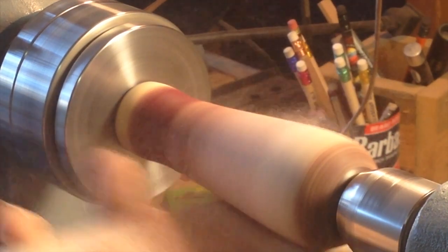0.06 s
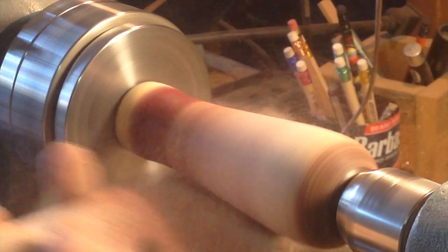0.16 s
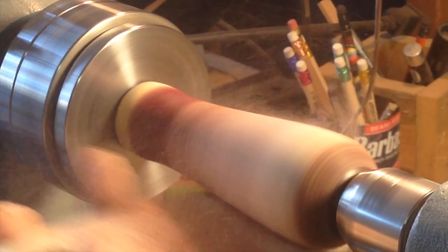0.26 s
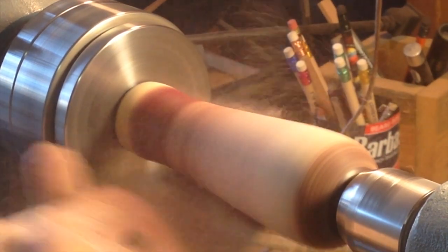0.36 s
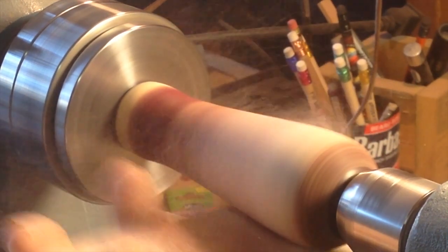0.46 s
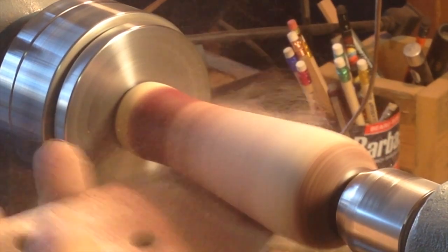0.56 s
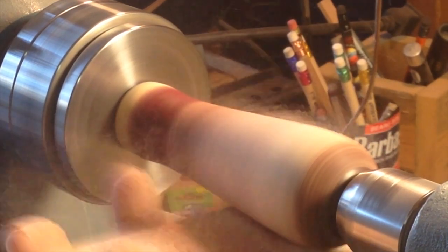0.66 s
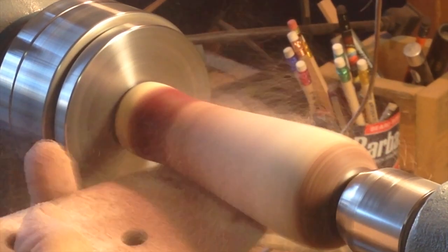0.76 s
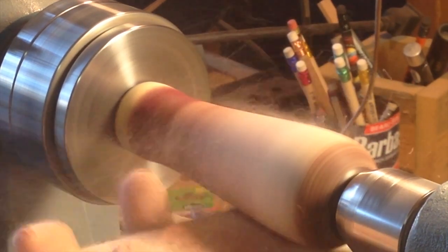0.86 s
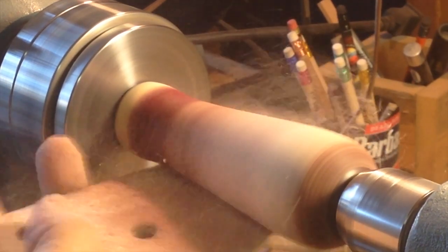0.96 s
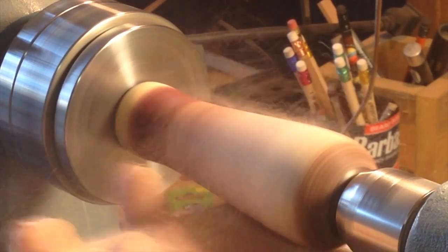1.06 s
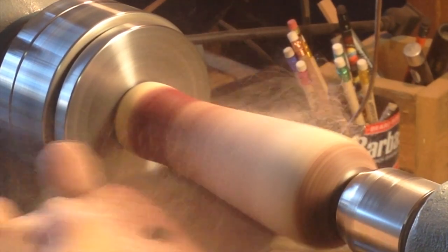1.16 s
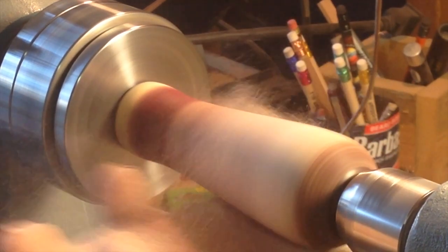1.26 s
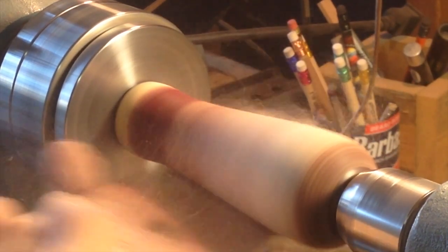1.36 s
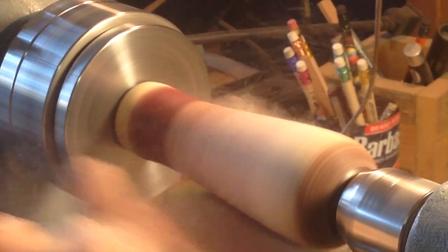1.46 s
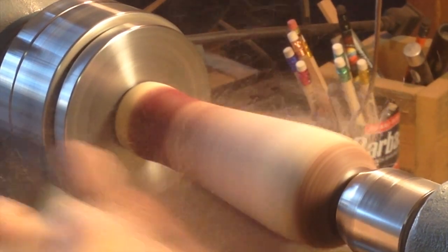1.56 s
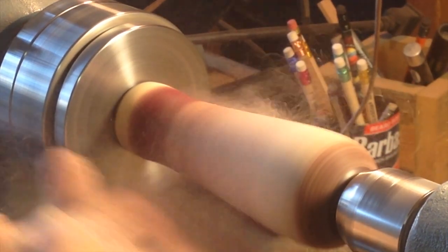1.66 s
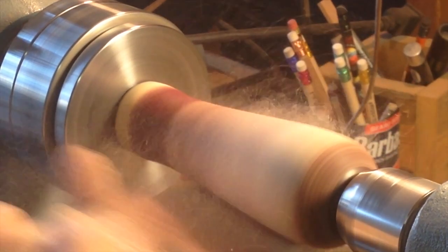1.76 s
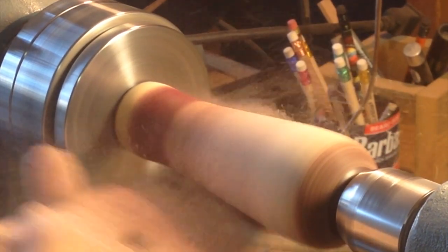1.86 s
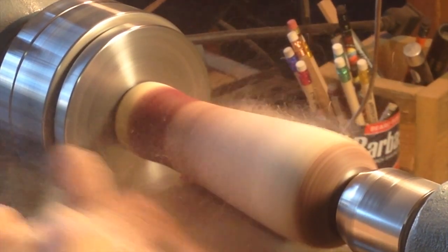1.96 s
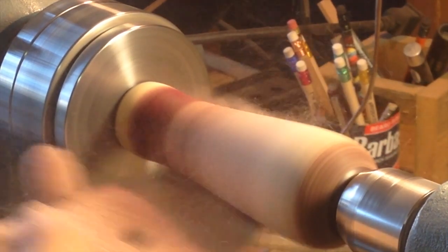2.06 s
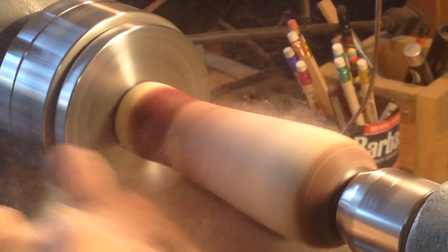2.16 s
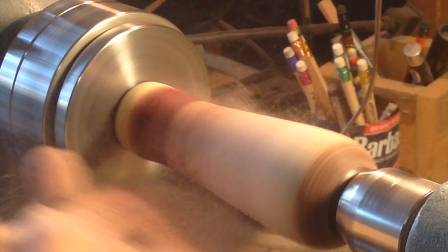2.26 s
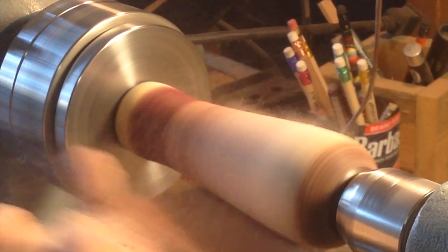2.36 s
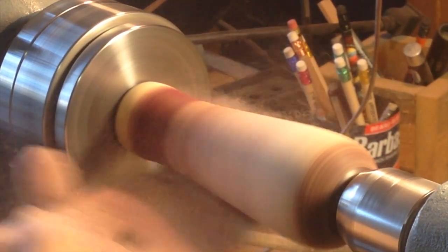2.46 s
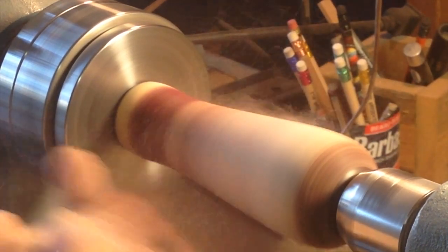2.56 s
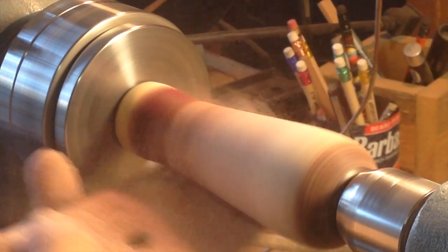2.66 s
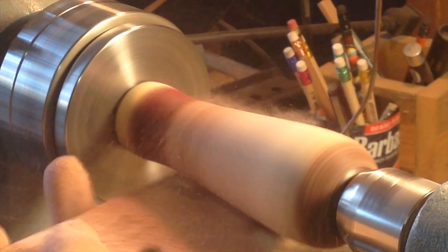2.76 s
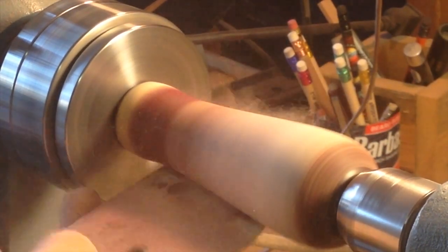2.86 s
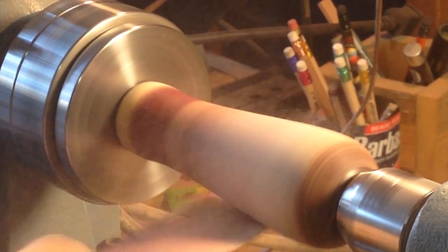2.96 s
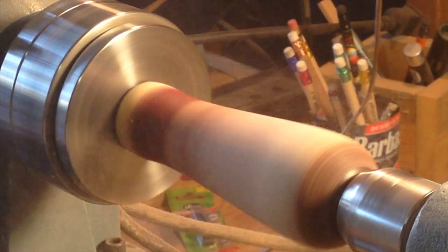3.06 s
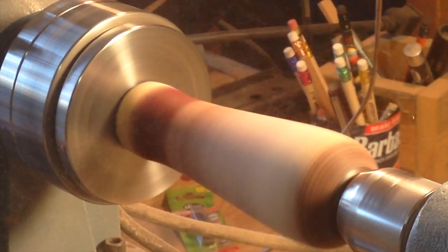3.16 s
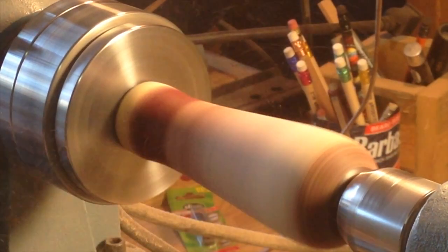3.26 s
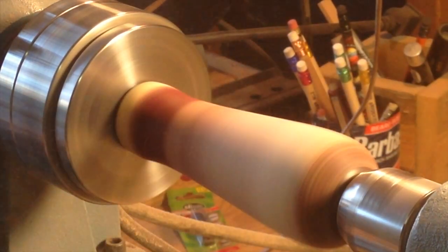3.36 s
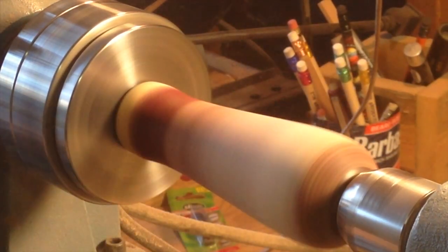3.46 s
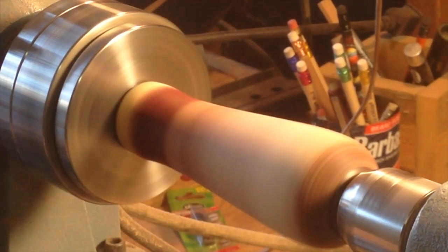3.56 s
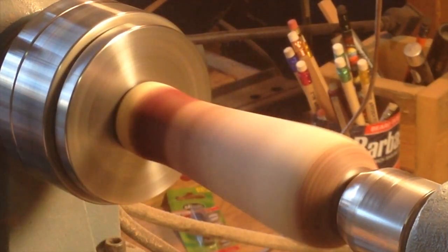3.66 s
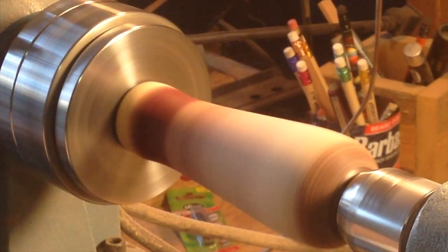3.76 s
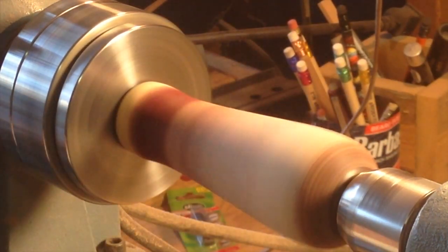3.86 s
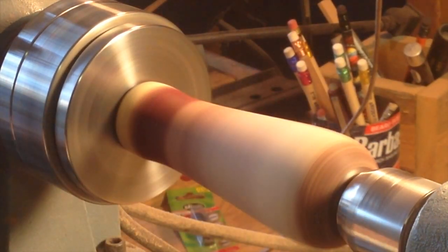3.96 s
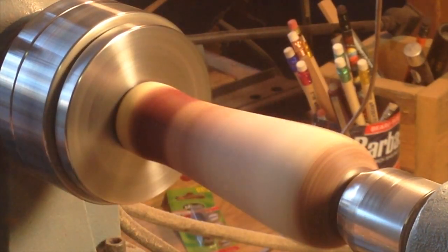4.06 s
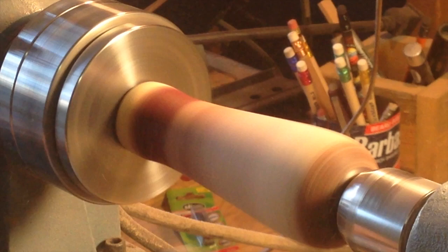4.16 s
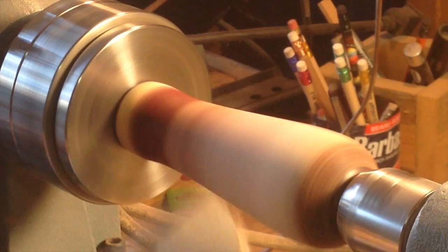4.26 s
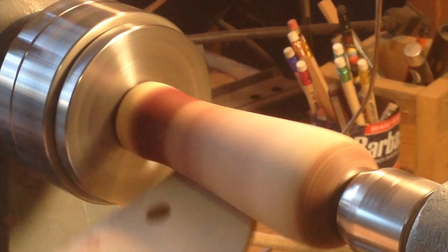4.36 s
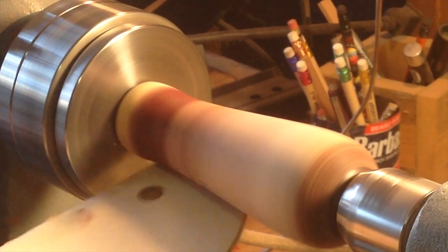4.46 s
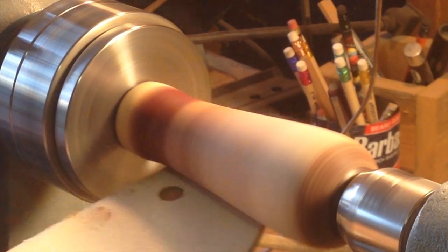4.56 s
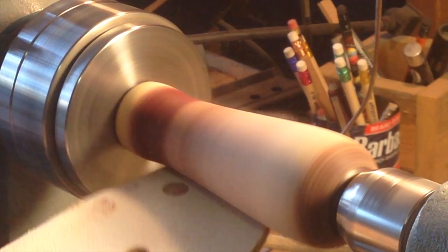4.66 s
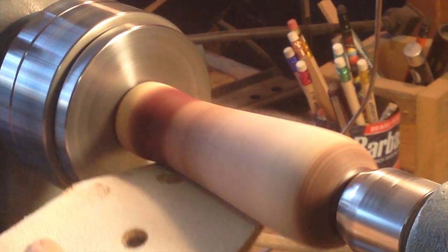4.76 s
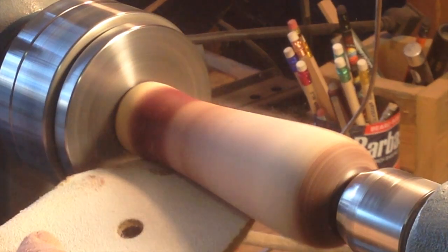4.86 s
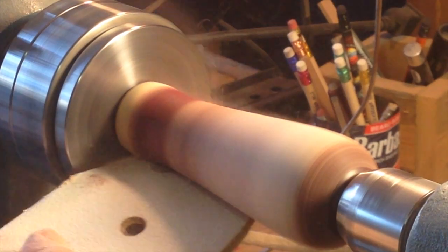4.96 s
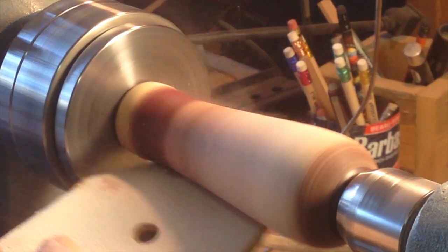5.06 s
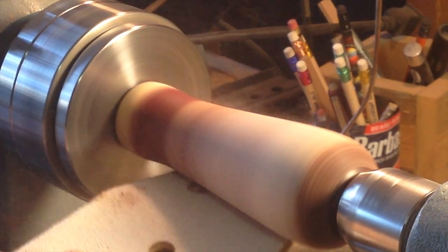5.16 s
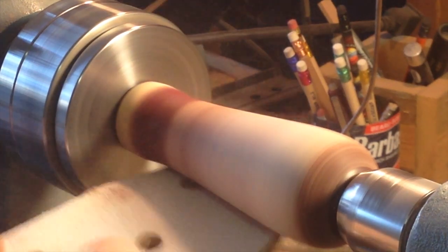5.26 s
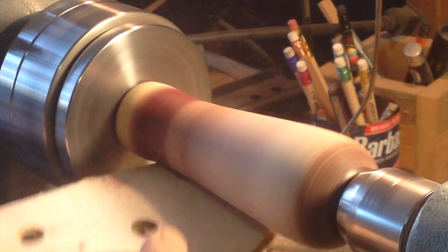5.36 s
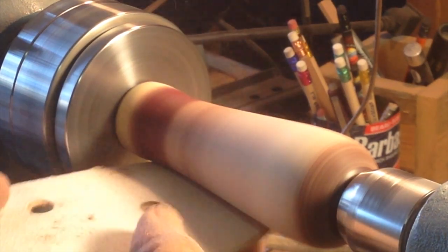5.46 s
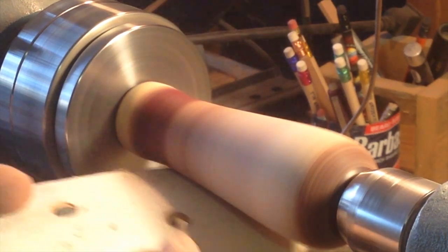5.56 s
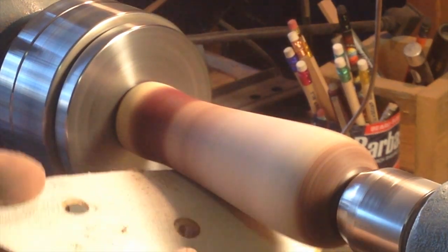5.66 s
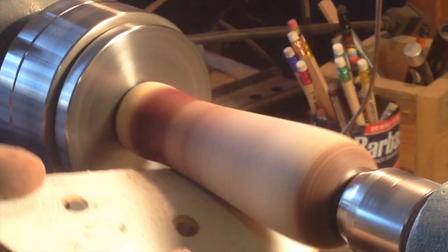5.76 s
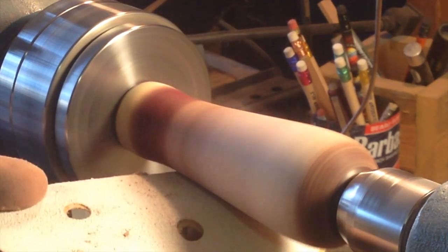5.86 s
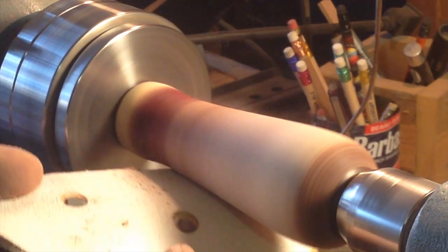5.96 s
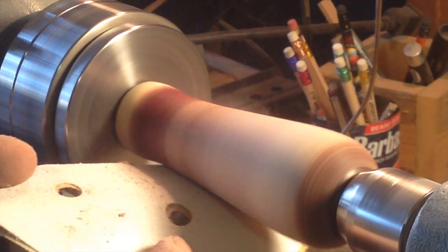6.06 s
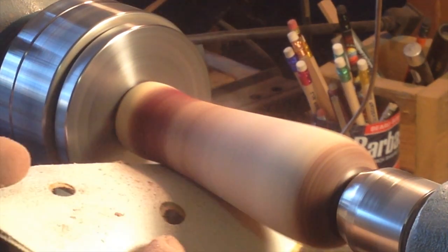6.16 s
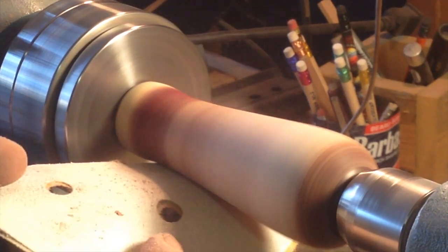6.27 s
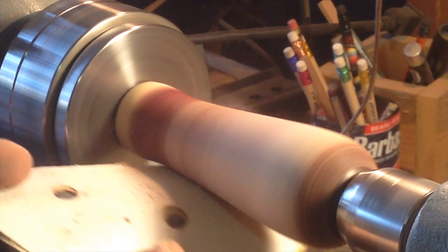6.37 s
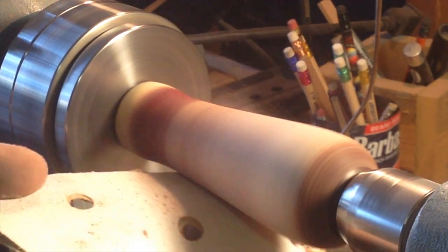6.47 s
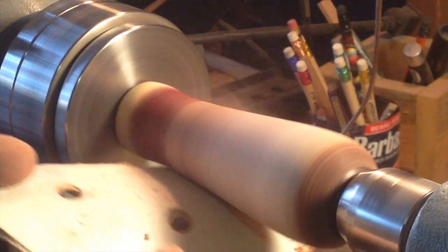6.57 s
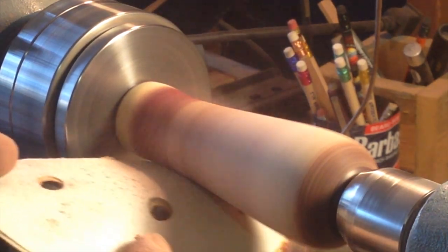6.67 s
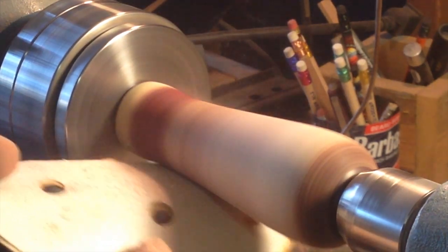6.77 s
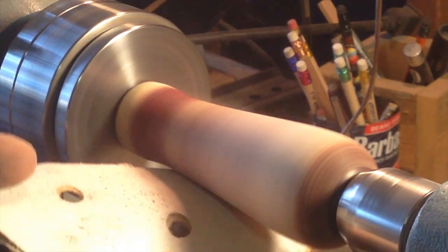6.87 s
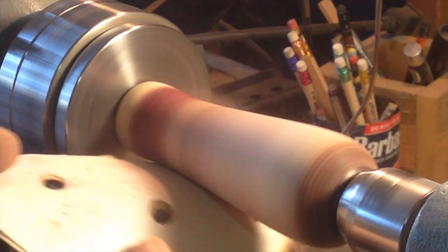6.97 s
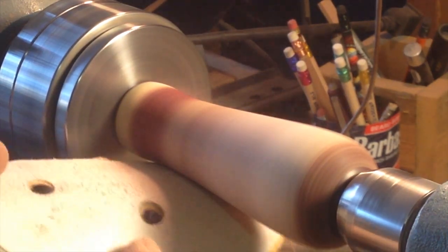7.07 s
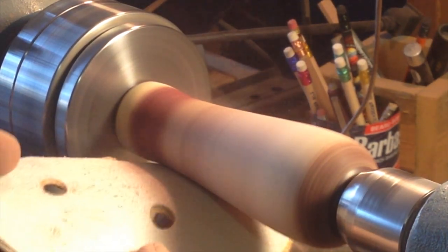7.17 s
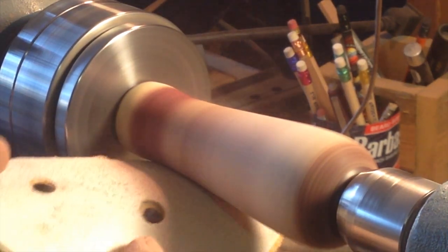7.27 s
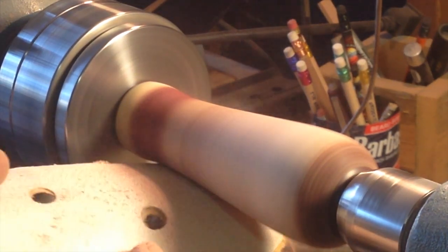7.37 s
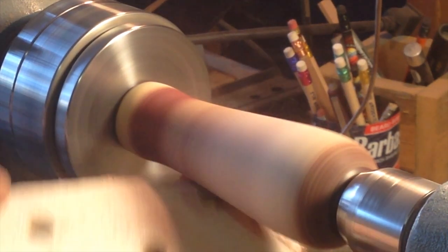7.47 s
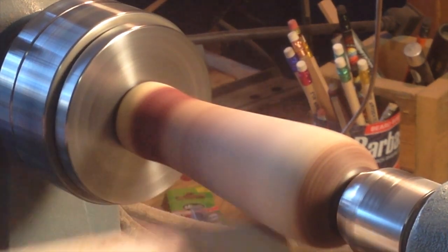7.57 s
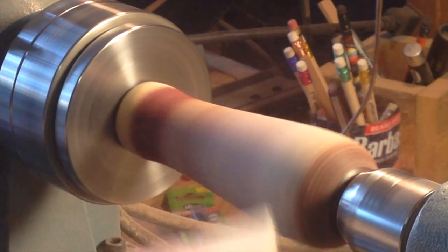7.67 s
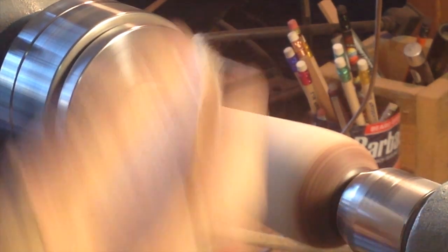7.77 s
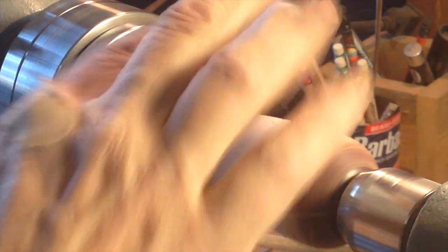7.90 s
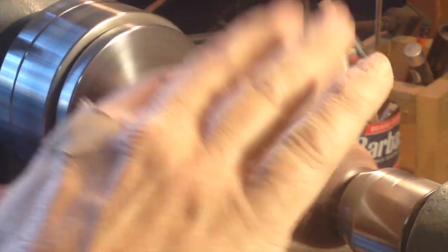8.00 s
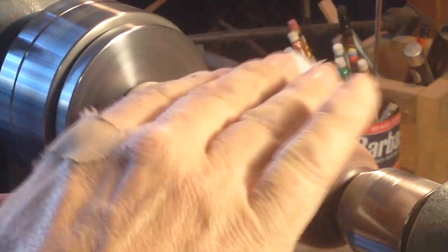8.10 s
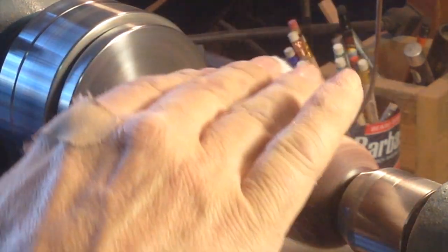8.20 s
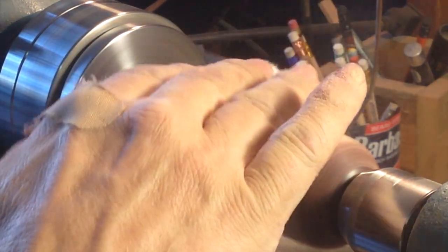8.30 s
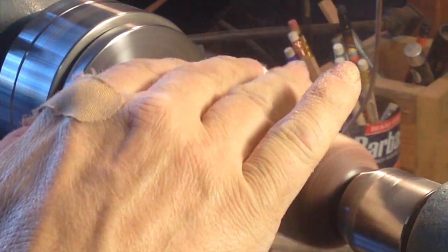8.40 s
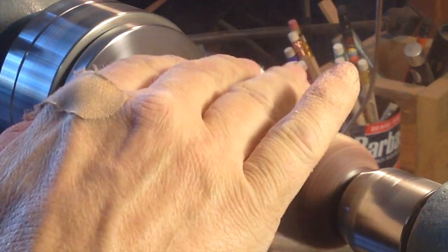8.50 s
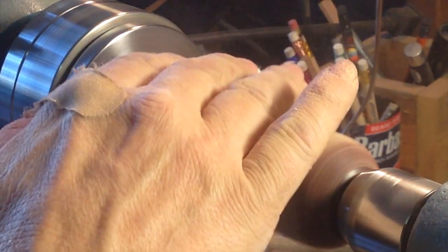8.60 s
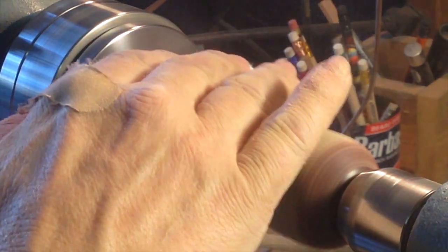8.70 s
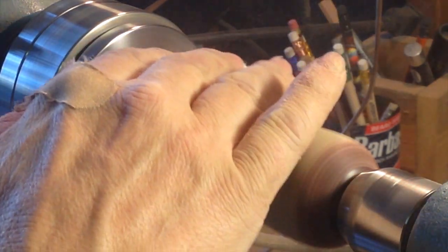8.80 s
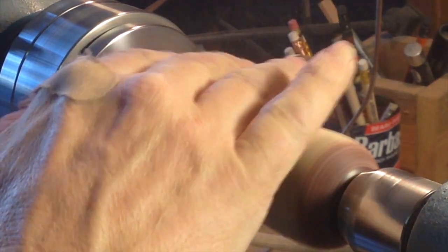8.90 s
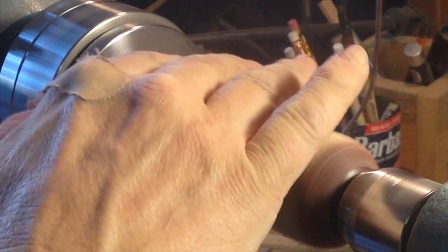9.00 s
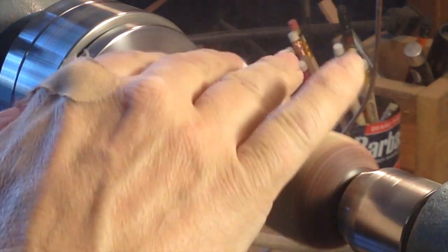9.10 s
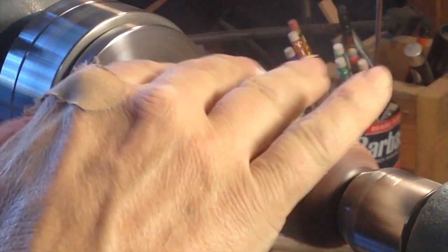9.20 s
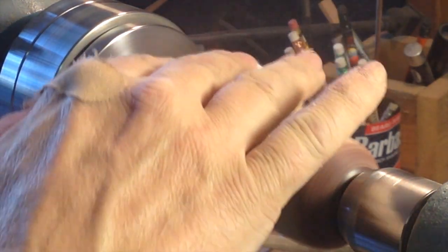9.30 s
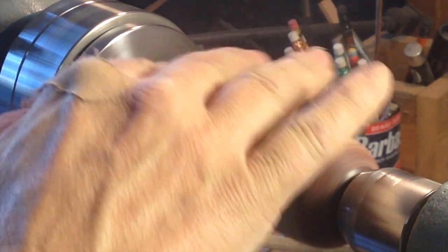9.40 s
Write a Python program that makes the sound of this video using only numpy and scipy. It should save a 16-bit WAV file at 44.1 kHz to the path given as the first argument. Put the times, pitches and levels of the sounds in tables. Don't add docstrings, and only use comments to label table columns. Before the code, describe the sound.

Close sandpaper hiss on spinning wood comes and goes over a buzzing lathe motor with fluttering metallic rattle, including one sharp catch and snap.

```python
import sys
import numpy as np
from scipy import signal
from scipy.fft import rfft, irfft, next_fast_len
from scipy.io import wavfile
from scipy.ndimage import uniform_filter1d, minimum_filter1d

SR = 44100
rng = np.random.default_rng(int(sys.argv[2]) if len(sys.argv) > 2 else 0)


def nominal_scale(level):
    x = np.asarray(level, float) / 20
    return 10 ** x


def store_wav(level_fs):
    pcm = np.round(np.clip(np.atleast_2d(level_fs), -1, 1) * 32767)
    wavfile.write(sys.argv[1], SR, pcm.T.astype(np.int16))


N = 416291

# pitch_hz, level_db (per Hz)
RUSH = [(15, -63), (25, -24), (69, -12), (121, -1.5), (191, -10), (257, -4), (404, -7), (558, -15.5),
        (811, -18), (1000, -19), (1150, -20), (1540, -20), (2130, -22), (4040, -30), (15000, -43.5)]
RUSH_DB = -42.5
# pitch_hz, width_hz, level_db
CASTING = [(215, 28, 1), (2240, 170, -9), (2380, 100, 8), (3420, 150, 1.5), (3950, 150, 8.5),
           (5640, 900, -0.5)]
# pitch_hz, level_db
BELT = [(40, -82), (70, -69), (115, -66.5), (200, -71), (285, -68.5), (420, -70.5), (620, -74), (760, -82)]
BELT_TAKES_DB = -6
# pitch_hz, level_db
TONES = [(164.5, -59), (535.7, -69.5), (689, -72), (889.8, -66.5), (920.5, -73), (982, -63),
         (1011.3, -59.5)]

# time_s, level_db
BUZZ = [(0, -41.5), (.75, -40.2), (1.25, -42), (1.7, -39), (2.15, -42.5), (2.7, -39.5), (3.15, -42),
        (4.2, -41), (4.95, -44), (5.45, -40), (6.2, -43.5), (6.8, -40.5), (7.35, -43), (7.7, -38),
        (8.2, -41), (8.7, -41.5), (9.2, -38.5), (9.43, -39.7)]
BUZZ_HZ = 119.865
BUZZ_START = (-.065, .17)
# level_db at the usual buzz, usual_buzz_db, gain_db per dB of buzz
THIRD = (-60, -39.5, 2.8)
# start_s, end_s, level_db, lag_turns
SURGES = [
    (3.6, 4.8, -40.5, 0.01),
    (5.714, 5.945, -41.5, 0.13),
    (8.124, 8.2, -41, 0.17),
]
UPPER_DB, SURGE_RISE_S, SURGE_FALL_S, SWING_TURNS = -51, 0.54, 0.49, 0.61
# multiple of twice mains, level_db under it
OVERTONES = [(3, -22), (5, -25), (6, -18)]
FLUTTER_HZ, FLUTTER_DB = (580, 660), -17

# time_s, speed_hz (turns a second)
SPEED = [(0.0, 22.346), (1.0, 22.296), (1.6, 22.283), (2.4, 22.303), (3.6, 22.388), (4.4, 22.381),
         (5.2, 22.341), (5.8, 22.364), (7.0, 22.294), (7.5, 22.312), (8.3, 22.397), (9.43, 22.296)]
# multiple of the speed, level_db
ORDERS_DB = [(2, -63), (3, -58), (4, -67), (5, -66), (6, -51), (8, -71), (10, -68), (11, -47.5), (12, -52),
             (13, -57.5), (14, -55.5), (15, -53.5), (16, -59), (17, -53.5), (18, -58.5), (19, -56.5),
             (20, -61), (22, -63), (24, -73), (28, -69), (29, -74)]
PUSH_TURN, LOW_LAG, HIGH_LAG = .2, .02, .23

# first_knock_s, rate_hz (knocks a second)
BURSTS = [(0.024, 29.765), (0.765, 29.72), (1.508, 29.745), (2.351, 29.76), (3.225, 29.815),
          (4.471, 29.795), (5.412, 29.81), (6.421, 29.755), (7.264, 29.82), (8.373, 29.755), (9.216, 29.72)]
# lull_db, peak_s, peak_db
RATTLE = [(-47.5, 0.37, -47), (-61, 1.19, -46), (-62, 2.01, -47), (-58, 2.93, -46.5), (-61.5, 3.93, -45.5),
          (-62, 5, -46), (-56.5, 6.12, -45.5), (-63, 6.8, -45.5), (-62, 7.82, -45.5), (-56.5, 8.7, -45),
          (-58.5, 9.5, -46)]
ARCH_POWER = 2.6
HOUSING_HZ = [718, 1011, 1350, 1520, 1579, 1625, 1715, 1885, 1548]
# level_db, t60_s
HOUSING = [(-14, 0.068), (-19, 0.094), (-1.8, 0.042), (-12, 0.035), (-7, .3), (-11, 0.04), (-5, 0.043),
           (-16.5, 0.063), (-11, 0.27)]
TOP_HZ = [2150, 2540, 3150, 3360, 3790, 3975, 4850, 5450, 5740]
# level_db, t60_s
HOUSING_TOP = [(-15.5, 0.12), (-14.5, 0.042), (-9, 0.011), (-10, 0.032), (-13, 0.055), (-14.5, 0.083),
               (-18, 0.024), (-9.5, 0.019), (-10, 0.017)]
# fifth_mode_db, eighth_mode_db, ninth_mode_db
STRIKE = [(-4, 11, -34), (-2, 12, -25), (-2.5, 11.5, -23), (-3.5, 10, -19), (-8, 9.5, -7), (-7, 15, -39),
          (-15, 9.5, -6), (-23, 9.5, -6), (-9.5, 11.5, -7), (-7, 10, -10), (-8, 6, -19)]
DRIFT_DB = [1.2, 0, 0.5, 1, -1.5, 13, -1.5, -8, 0, -8, 8, 0.1, -1, -3, -1, -1.5, -4, -1]
DRIFT_S = .3
REBOUND_S, REBOUND_BODY, REBOUND_TOP = .0082, .6, .5
LATE_S = [0, .006, -.0008, .00255, .00142, .00026, .00212, .00099, .00283, .0017, .0005, .0012, .0008, .002,
          .004, .0008, .002, .0015]
# time_s, sharpness_db, low_panel_db, middle_panel_db, high_panel_db
BARE = [(3.5289, -43, 6.0, 5.0, 3.0), (3.5643, -44, 7.0, 6.0, 7.0), (3.5972, -37, 2.0, -0.0, 1.0),
        (3.6316, -37.5, -0.0, 0.0, -1.0), (3.6641, -36.5, 3.0, 3.0, 1.0), (3.698, -33.5, -2.0, 2.0, 0.0),
        (3.7304, -36, 2.0, 2.0, 2.0), (3.7648, -33.5, 1.0, 2.0, 2.0), (3.7983, -33, -1.0, 1, 2),
        (3.8317, -35, 1.0, 0, 1.0), (3.8651, -35, 3, 0.0, -1.0), (3.8985, -35.5, 5, -3.0, -1.0),
        (3.9325, -38, 9, -3.0, 1.0), (3.9659, -35, 6, -1.0, -1.0), (3.9988, -37, 4.0, -0.0, -2.0),
        (4.0347, -35, 1.0, -1.0, -3.0), (4.0662, -35.5, 2.0, -3.0, -4), (4.1004, -41, 4.0, 4.0, -2.0),
        (4.1344, -42, 2.0, -0.0, -2.0), (4.1684, -40, 3.0, -3.0, -4.0), (7.7039, -35.5, 4, 6, 5),
        (7.7378, -34, 1.0, 1.0, 2), (7.7712, -34, 3, -1, -0.0), (7.8037, -36, 4.0, -4.0, -0.0),
        (7.8366, -38, 4.0, -1.0, -1.0), (7.8705, -36, 6, -6.0, -2.0), (7.9044, -35.5, 3.0, -1.0, -5),
        (7.9379, -35.5, 2.0, 0.0, -3), (7.9715, -38, 2, 0, 0), (8.0047, -39, 4.0, 1.0, 1.0),
        (8.0381, -41, 6.0, 1.0, -4.0)]
CLATTER_DB, CLATTER_T60_S, CLATTER_HZ = -60, 0.19, (1910, 5800)

# time_s, peak_db, t60_s, low_edge_hz
CATCHES = [
    (2.928, -32.5, 0.045, 800),
    (4.384, -50, .03, 900),
    (4.992, -33.5, 0.094, 1000),
    (5.02, -49, 0.18, 280),
    (8.077, -43, .04, 1500),
]
# time_s, peak_db, pitch_hz
SNAPS = [(4.9933, -14, 4000), (5.011, -17, 3800), (5.017, -19, 3600), (5.0376, -18, 4000),
         (5.0600, -22, 3000)]
SNAP_T60_S = .004
# time_s, peak_db, pitch_hz, t60_s
BUMPS = [(4.993, -40, 330, 0.073), (5.005, -38, 135, 0.11), (5.016, -34, 320, 0.093)]
# middle_s, length_s, level_db
RUSTLE = (7.95, .14, -61)

# start_s, throb_depth, contact_angle_turns
GRIPS = [
    (0, 0.23, -0.41),
    (4, 0.37, -0.43),
    (5.45, 0.98, 0.0092),
    (7.9, 0.41, 0.068),
]
# time_s, pressure_db, sheet_flex_db
CONTACTS = [
    [(0, -29, 3), (.15, -28, 0), (1.0, -30.5, -1), (1.79, -28.5, 0), (2.33, -30, -0.5), (2.9, -28, 0),
     (3.02, -37, 3.5), (3.09, -42, -1.5), (3.14, -75, 22)],
    [(4.37, -70, 0), (4.39, -46, -4), (4.42, -36, -4), (4.5, -41, 1.5), (4.67, -25, 3), (4.86, -22, 1.5),
     (5.265, -23.5, -1), (5.295, -30, -2.5), (5.46, -43.5, 3.5)],
    [(5.46, -44, -2), (5.54, -32, 0), (5.86, -33.5, -1), (5.93, -28, -0.5), (6.07, -27, 0.5),
     (6.11, -31, 3), (6.92, -30, 0.5), (7.51, -35, 1), (7.7, -55.5, -1)],
    [(8.07, -83, 0), (8.08, -42, -3), (8.14, -32.5, -1.5), (8.27, -28.5, 1.5), (8.62, -30, -5.5),
     (8.79, -40, -1.5), (8.98, -39.5, 0), (9.33, -33.5, -1.5), (9.44, -40, 1)],
]
# pitch_hz, level_db (per Hz)
GRIP_1 = [(590, -58), (1000, -23.5), (1210, -40), (1330, -22.5), (1490, -45), (1540, -26.5), (2570, -15.5),
          (3880, -3), (5980, -5.5), (9750, 1.5), (15200, 2.5)]
GRIP_2 = [(590, -43.5), (1000, -21), (1340, -14), (1460, -17), (1890, -11), (2140, -14), (4060, -5.5),
          (5580, -6), (7760, 1.5), (13600, 1), (15200, -3)]
GRIP_3 = [(590, -10), (1000, -6.5), (1100, -3), (1330, -5), (1980, -5.5), (2380, -0.5), (2920, -5.5),
          (4100, -5), (5090, -5.5), (8500, 7), (15200, 6.5)]
GRIP_4 = [(590, -51), (1000, -41), (1190, -28), (1340, -36), (1440, -27), (1580, -16), (2750, -7),
          (3500, 1.5), (5710, 2), (6850, 8), (15200, 3.5)]
# pitch_hz, width_hz, level_db
SHEET = [
    [(4850, 220, 3.5)],
    [(4050, 280, 6.5), (5200, 150, 5.5), (7760, 280, 3.5), (9070, 130, 5)],
    [(4090, 260, 5.5), (5900, 92, 2), (6730, 160, -1), (8500, 400, -3.5)],
    [(4130, 150, 2), (5100, 170, 3), (6700, 300, 1)],
]
# firm_db, ring_db (3-5 kHz), fizz_db (top), scrape_db (low)
FIRM = [(-29, -8.5, 1.5, 5.5), (-32.5, -5, -2, -2), (-34.5, -5, -2, -5.5), (-29.5, -5.5, -2, 3.5)]
# ring_db, fizz_db, scrape_db per dB lighter
LIGHTER = [(0.33, -0.34, 0.42), (0.21, -0.18, 0.44), (0.11, -0.36, 0.63), (0.18, 0.19, 0.98)]
LIGHTEST_DB, SCRAPE_FLEX = 10.5, 0.38
END_GRAIN = [(2, .08, .47), (4, .055, .51), (6, .055, 0)]
# middle_s, length_s, pressure_change_db
JOLTS = [(0.048, .08, -1), (1.06, 0.089, -2.5), (1.17, .12, -1), (1.482, 0.11, -1.5), (1.69, 0.11, -2),
         (2.45, 0.32, 1), (2.7, 0.19, -2.5), (2.82, .15, 0), (4.476, 0.072, 3.5), (4.856, 0.14, 1.5),
         (5.583, 0.11, -1.5), (5.65, .12, 2), (6.79, 0.39, -0.5), (7.633, 0.14, 11), (8.122, .04, 3),
         (4.51, .04, -3), (4.625, .06, 0.5), (0.697, .05, 1.5), (.91, 0.055, 2), (9.095, 0.16, 4),
         (9.18, 0.22, -3.5)]
# middle_s, length_s, ring_db, fizz_db, scrape_db
BENDS = [(1.05, 0.58, 3, 1.5, .7), (4.42, .06, -2, -4, 4), (4.492, .1, 1, 1, 3), (4.67, 0.16, 0.5, 0.5, 0),
         (4.85, 0.11, -2.5, 0, 0), (5.035, .15, 2.5, -.7, 5), (5.26, 0.16, 1, -1, -10),
         (5.38, .12, 1, 2.5, 0), (5.513, .1, 1.5, 3.5, 2), (5.72, .3, 0, -0.5, -2),
         (5.97, 0.11, -1, 1.5, -6), (6.4, 1, -0.5, 0.5, -3), (6.85, .3, 1.5, -0.5, 2.5),
         (7.407, .2, 0.5, 0.5, -2), (7.627, 0.11, 1, 1.5, -12), (8.106, .06, -1.5, -5, -1),
         (8.2, 0.16, 1.5, 3, -1), (8.446, 0.25, 1.5, 1.5, 3), (9.1, .2, -1, 0.5, -2),
         (8.703, .15, -0.5, 2, 2), (9.33, 0.22, 3, -2, 1)]
# middle_s, length_s, pitch_hz, width_hz, level_db
SINGS = [(0.06, .16, 3950, 400, 3), (0.168, .16, 4850, 300, 3), (.25, .3, 6100, 500, -4),
         (1.2, .5, 6800, 400, 0), (4.623, .1, 3500, 1500, 2), (4.677, .05, 3600, 800, 3),
         (4.902, .08, 4130, 300, 8), (5.114, .1, 3800, 1500, -4), (5.36, .16, 4220, 400, -3),
         (4.55, .25, 12500, 4000, 3), (6.85, .3, 3000, 800, -6), (5.7, .35, 5600, 400, 5.5),
         (6.0, .2, 8100, 500, 2), (6.35, .3, 7900, 600, 1.5), (6.62, .3, 6800, 200, 3),
         (6.62, .3, 7500, 250, 6), (7.1, .4, 8000, 500, -3), (7.35, 0.59, 5740, 700, 2.5),
         (8.15, .14, 4900, 500, 9), (8.19, .1, 3600, 500, -4), (8.32, .25, 7000, 500, 1),
         (8.42, .2, 2800, 500, -8), (8.405, .2, 8500, 900, 3)]
# start_s, end_s, from_hz, to_hz, depth_db, width_share
LIFT = (7.52, 7.66, 7500, 14500, -11, .05)

# time_s, low_hz, high_hz, level_db
SPLITS = [(.238, 8250, 9650, -37), (.68, 4200, 5700, -43), (.70, 4700, 5700, -43), (.70, 11000, 12400, -36),
          (.773, 5250, 6250, -46), (.773, 11750, 13100, -38), (2.281, 6300, 8300, -40),
          (2.374, 6900, 8300, -40), (2.374, 9600, 11100, -36), (6.995, 6900, 8250, -41),
          (6.995, 9650, 11050, -43), (7.088, 6250, 8250, -41)]
EDGE_HZ = 15290


def evened(x):
    return x / np.sqrt(np.mean(x ** 2) + 1e-20)


def read(points, hz):
    f, value = np.transpose(points)
    return np.interp(np.log(hz + 1), np.log(f + 1), value)


def peaks_db(modes, hz):
    return sum(db / (1 + (2 * (hz - f) / width) ** 2) for f, width, db in modes)


def add(mix, s, sound):
    part = mix[max(round(s * SR), 0):][:len(sound)]
    part += sound[:len(part)]


def curve(rows, column):
    rows = np.array(rows)
    return np.interp(np.arange(N) / SR, rows[:, 0], rows[:, column])


def bump(t, s, length):
    return np.cos(np.pi * np.clip((t - s) / length, -.5, .5)) ** 2


def smooth(x, bins, frames):
    return evened(uniform_filter1d(uniform_filter1d(x, size=bins, axis=0), size=frames, axis=1))


def band_noise(band_hz, order, length=N):
    b, a = signal.butter(N=order, Wn=band_hz, btype="band", fs=SR)
    return evened(signal.lfilter(b, a, rng.standard_normal(length)))


def rush():
    size = next_fast_len(N)
    hz = np.fft.rfftfreq(size, 1 / SR)
    colour_db = read(RUSH, hz) + peaks_db(CASTING, hz)
    taken_db = BELT_TAKES_DB / (1 + (hz / 800) ** 4) / (1 + (55 / (hz + 1)) ** 4)
    whole = rfft(rng.standard_normal(size)) * nominal_scale(colour_db)
    rest = irfft(whole * nominal_scale(taken_db), size)[:N]
    return nominal_scale(RUSH_DB) * rest * size / np.sqrt(2) / np.linalg.norm(whole)


def belt(turns):
    laps, lines = np.arange(4096) / 4096, np.arange(2049)
    luck = rng.standard_normal((2049, 2)).T
    size = nominal_scale(read(BELT, lines * SPEED[0][1] / 3) + 2 * luck[0])
    size *= (lines % 3 > 0) * (lines < 105)
    lap = irfft(size * np.exp(20j * luck[1])) * 4096 / np.sqrt(2)
    return np.interp(turns / 3 % 1, laps, lap, period=1)


def surges():
    t, size = np.arange(N) / SR, nominal_scale(UPPER_DB) * np.ones(N, complex)
    for start, end, db, lag in SURGES:
        grown = np.interp(t, [start - SURGE_RISE_S, start, end, end + SURGE_FALL_S], [0, 1, 1, 0])
        swing = np.exp(-2j * np.pi * (lag + SWING_TURNS * (1 - grown)))
        size += (nominal_scale(db) - nominal_scale(UPPER_DB)) * grown * swing
    return size


def buzz():
    turns = BUZZ_HZ * np.arange(N) / SR
    level_db = curve(BUZZ, 1)
    low = nominal_scale(level_db) * np.cos(2 * np.pi * (turns + BUZZ_START[0]))
    low += nominal_scale(THIRD[0] + THIRD[2] * (level_db - THIRD[1])) * np.cos(3 * np.pi * turns)
    surge = surges()
    high = (surge * np.exp(2j * np.pi * (2 * turns + BUZZ_START[1]))).real
    for k, db in OVERTONES:
        high += abs(surge) * nominal_scale(db) * np.cos(2 * np.pi * (round(k) * turns + rng.random()))
    high += abs(surge) * nominal_scale(FLUTTER_DB) * band_noise(FLUTTER_HZ, 2)
    tones = sum(nominal_scale(db) * np.cos(2 * np.pi * hz * np.arange(N) / SR) for hz, db in TONES)
    return np.sqrt(2) * (low + high + tones)


def spindle(turns):
    out = np.zeros(N)
    for k, db in ORDERS_DB:
        k = round(k)
        waver_db = .75 * np.interp(np.arange(N), np.linspace(0, N, num=40), rng.standard_normal(40))
        lag = .8 if k > 17 else HIGH_LAG if k > 9 else LOW_LAG
        out += np.sqrt(2) * nominal_scale(db + waver_db) * np.cos(2 * np.pi * (k * (turns + PUSH_TURN) + lag))
    return out


def ring(hz, db, t60, rise):
    t = np.arange(6000) / SR
    return (1 - np.exp(-t / rise)) ** 2 * nominal_scale(db - 60 * t / t60) * np.sin(2 * np.pi * (hz * t + rng.random()))


def rattle_db(times):
    lull_db, peak_s, peak_db = np.transpose(RATTLE)
    knots = np.ravel([(s, peak) for (s, rate), peak in zip(BURSTS, peak_s)])
    place = np.interp(times, knots, np.arange(len(knots)))
    burst, away = place.astype(int) // 2, place % 2 - 1
    low_db = np.where(away < 0, lull_db[burst], np.roll(lull_db, -1)[burst])
    return peak_db[burst] + (low_db - peak_db[burst]) * abs(away) ** ARCH_POWER


def clatter(at, level_db):
    knocks, t = np.zeros(N + SR), np.arange(3000) / SR
    knocks[at] = nominal_scale(CLATTER_DB + level_db)
    puff = np.minimum(t / 0.0025, 1) * nominal_scale(-60 * t / CLATTER_T60_S)
    return signal.oaconvolve(knocks, puff)[:N] * band_noise(CLATTER_HZ, 3)


def rattle(body_db=-39, top_db=-43, hardness=1.75, bare_db=-35, contrast=1.6):
    ends = [s for s, rate in BURSTS[1:]] + [N / SR]
    times = np.concatenate([np.arange(s, end - .015, 1 / rate) for (s, rate), end in zip(BURSTS, ends)])
    chance, burst = rng.standard_normal((400, 4))[:len(times)], np.searchsorted(ends, times)
    at = ((times + .0014 + .00005 * chance[:, 0]) * SR).astype(int)
    rebound = at + ((REBOUND_S + .0005 * chance[:, 3]) * SR).astype(int)
    level_db = rattle_db(times) + 50
    sharp_db = top_db + hardness * level_db + chance[:, 2]
    drift = np.clip((times - np.array(RATTLE)[burst, 1]) / DRIFT_S, -.5, 1.2)
    strike_db = np.outer(drift, DRIFT_DB)
    strike_db[:, [4, 7, 8]] += np.array(STRIKE)[burst]
    for s, db, *panel_db in BARE:
        near = np.argmin(abs(at / SR - s))
        sharp_db[near] = bare_db + contrast * (db + 35)
        strike_db[near, 11:] = np.repeat(panel_db, [2, 2, 3])
    out = np.zeros(N + SR)
    modes = [*HOUSING, *HOUSING_TOP]
    for k, hz in enumerate([*HOUSING_HZ, *TOP_HZ]):
        top, knocks = k >= len(HOUSING), np.zeros(N + SR)
        each_db = (1.1 if top else .45) * rng.standard_normal(400)[:len(at)] + .4 * chance[:, 1]
        knocks[at] = nominal_scale((sharp_db if top else body_db + level_db) + strike_db[:, k] + each_db)
        bounce = REBOUND_TOP if top else REBOUND_BODY * (k not in (4, 8))
        knocks[rebound] = bounce * nominal_scale(2 * chance[:, 1]) * knocks[at]
        rung = signal.oaconvolve(knocks, ring(hz, *modes[k], .0007 if top else .001))[:len(out)]
        out += np.roll(rung, int(LATE_S[k] * SR))
    return out[:N] + clatter(at, sharp_db - top_db)


def catches():
    out, t = np.zeros(N), np.arange(6000) / SR
    for s, db, t60, low_hz in CATCHES:
        add(out, s, nominal_scale(db - 60 * t / t60) * band_noise([low_hz, 3500], 2, len(t)))
    for s, db, hz in SNAPS:
        add(out, s, nominal_scale(db - 60 * t / SNAP_T60_S) * np.sin(2 * np.pi * hz * t))
    for s, db, hz, t60 in BUMPS:
        add(out, s, nominal_scale(db - 60 * t / t60) * np.sin(2 * np.pi * hz * t))
    s, length, db = RUSTLE
    rustle = evened(np.diff(rng.standard_normal(N + 1)))
    return out + nominal_scale(db) * bump(np.arange(N) / SR, s, length) * rustle


def jolts_db(t):
    return sum(db * bump(t, s, length) for s, length, db in JOLTS)


def noise(shape_db, patchy_db, streaky_db):
    a, b, patches, streaks = rng.standard_normal((N // 128 + 5, 257, 4)).T
    luck_db = patchy_db * smooth(patches, 5, 30) + streaky_db * smooth(streaks, 2, 50)
    return signal.istft((a + 1j * b) * nominal_scale(shape_db + luck_db), nperseg=512, noverlap=384)[1][:N]


def passing_db(hz, t):
    start, end, from_hz, to_hz, depth_db, width = LIFT
    off = np.log((hz[:, None] + 1) / np.interp(t, [start, end], [from_hz, to_hz])) / width
    change_db = depth_db * np.exp(-off ** 2) * bump(t, (start + end) / 2, 1.8 * (end - start))
    for s, length, f, width_hz, db in SINGS:
        change_db += np.outer(peaks_db([(f, width_hz, db)], hz), bump(t, s, length))
    return change_db


def sheet_hiss(t, grip):
    hz = np.fft.rfftfreq(512, 1 / SR)
    colours = np.array([read(g, hz) for g in (GRIP_1, GRIP_2, GRIP_3, GRIP_4)])
    colours += [peaks_db(modes, hz) for modes in SHEET]

    def power_db(low, high):
        return 10 * np.log10((10 ** (colours[:, (hz > low) & (hz < high)] / 10)).sum(1))

    zones = np.array([np.interp(hz, [1930, 3470, 4900, 6440, 8000, 10100], row) for row in
                      ([0, 1, 1, 0, 0, 0], [0, 0, 0, 0, 0, 1], [1, 0, 0, 0, 0, 0])])
    main_db = power_db(5500, 10000)
    usual = np.array([power_db(3000, 5500) - main_db, power_db(10000, 15000) - main_db, 0 * main_db])
    rows = np.concatenate(CONTACTS)
    firm = np.transpose(FIRM)[:, grip]
    pressure_db, flex_db = [np.interp(t, rows[:, 0], rows[:, column]) for column in (1, 2)]
    lighter_db = np.minimum(firm[0] - pressure_db - jolts_db(t), LIGHTEST_DB)
    change = firm[1:] - usual[:, grip] + np.transpose(LIGHTER)[:, grip] * lighter_db
    change += np.outer([1, 0, SCRAPE_FLEX], flex_db)
    change += sum(np.outer(zone_db, bump(t, s, length)) for s, length, *zone_db in BENDS)
    shape_db = (colours - main_db[:, None])[grip].T + zones.T @ change + passing_db(hz, t)
    return evened(noise(shape_db, patchy_db=.4, streaky_db=1.5))


def hand_pressure():
    pressure, t = np.zeros(N), np.arange(N) / SR
    for rows in CONTACTS:
        start, end = rows[0][0], rows[-1][0]
        touching = abs(t - (start + end) / 2) <= (end - start) / 2
        pressure += uniform_filter1d(touching * 1., size=200, mode="nearest") * nominal_scale(curve(rows, 1))
    return pressure


def sanding(turns):
    t = np.arange(N // 128 + 5) * 128 / SR
    grip = np.searchsorted([g[0] for g in GRIPS], t, "right") - 1
    hiss = sheet_hiss(t, grip)
    grit_db = 0.95 * evened(uniform_filter1d(rng.standard_normal(N), size=30))
    snags_db = 0.56 * evened(uniform_filter1d(rng.standard_normal(N), size=500))
    hand_db = np.interp(np.arange(N) / SR, t, jolts_db(t))
    now = grip[np.arange(N) // 128]
    depth, angle = np.array(GRIPS)[now, 1], np.array(GRIPS)[now, 2]
    throb = 1 + depth * sum(d * np.cos(2 * np.pi * (k * (turns + angle) + p)) for k, d, p in END_GRAIN)
    return hiss * nominal_scale(6.0 + grit_db + snags_db + hand_db) * throb * hand_pressure()


def scene():
    turns = np.cumsum(curve(SPEED, 1)) / SR
    mono = rush() + belt(turns) + buzz() + spindle(turns) + rattle() + catches() + sanding(turns)
    return np.array([mono, mono])


def dropouts(x):
    hz, t, z = signal.stft(x, SR, nperseg=1024)
    need = smooth(rng.standard_normal((len(t), len(hz))).T, 4, 9)
    limit = np.interp(hz, [1900, 2200, 9000, 12000, 14000], [5, 3.25, 3.1, 2.5, 1.7])
    kept = minimum_filter1d(need < limit[:, None], size=3, axis=0)
    return signal.istft(z * kept, SR, nperseg=1024)[1][:N]


def ear_splits():
    side, hz = np.zeros(N), np.fft.rfftfreq(2048, 1 / SR)
    for s, low_hz, high_hz, db in SPLITS:
        band = evened(irfft(rfft(rng.standard_normal(2048)) * (hz > low_hz) * (hz < high_hz)))
        add(side, s - 1024 / SR, nominal_scale(db + 0.5) * band * np.sqrt(np.hanning(2048)))
    return np.array([side, -side])


def band_limit(x):
    return signal.sosfilt(signal.butter(12, 16480, fs=SR, output="sos"), x)


def record(dry):
    edge = signal.firwin(1023, EDGE_HZ, window=("kaiser", 9), fs=SR)
    limited = signal.oaconvolve(dropouts(dry[0]) + ear_splits(), edge[None], "same")
    return band_limit(limited)


dry = scene()
out = record(dry)
store_wav(out)
```